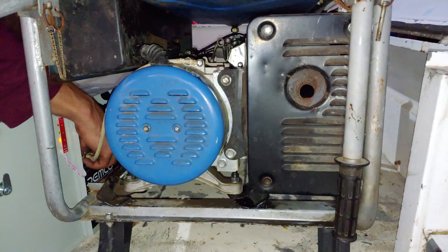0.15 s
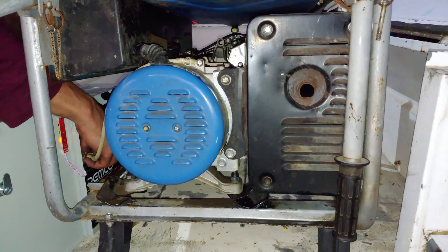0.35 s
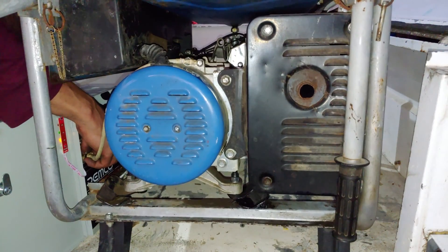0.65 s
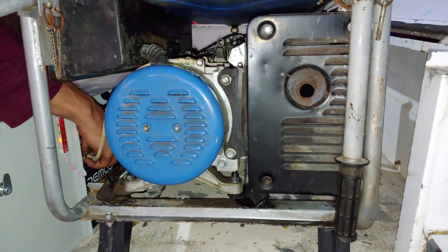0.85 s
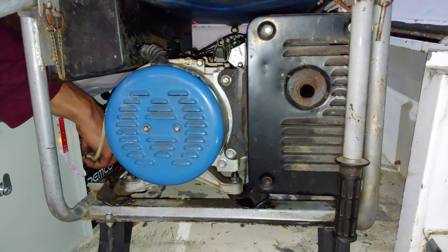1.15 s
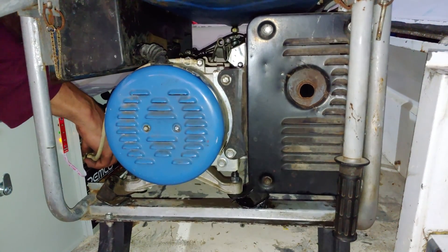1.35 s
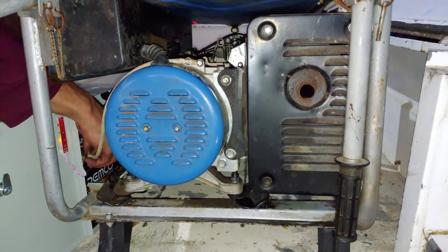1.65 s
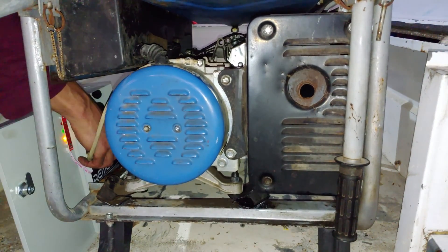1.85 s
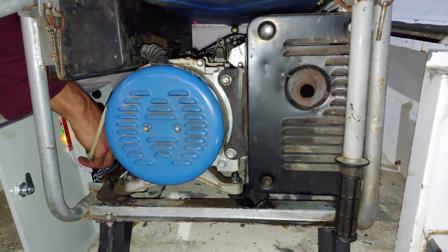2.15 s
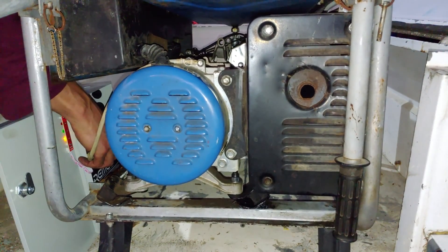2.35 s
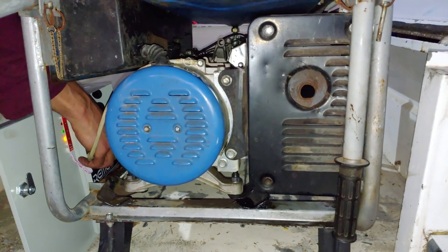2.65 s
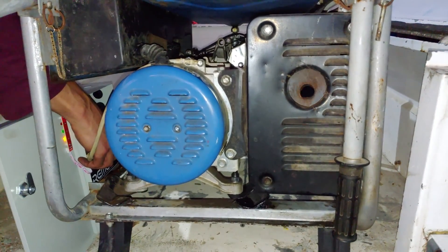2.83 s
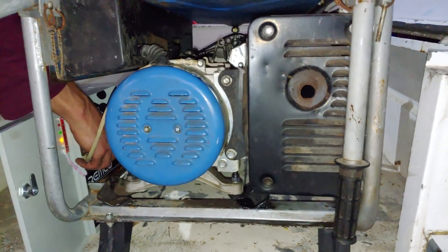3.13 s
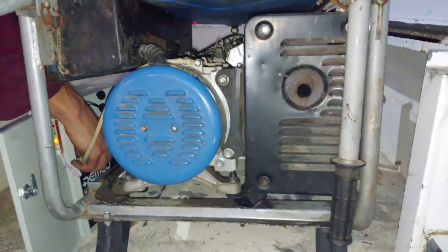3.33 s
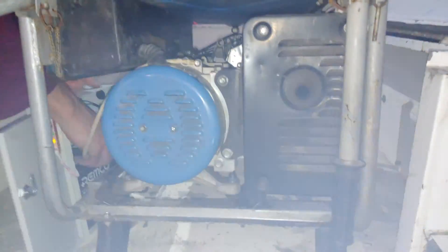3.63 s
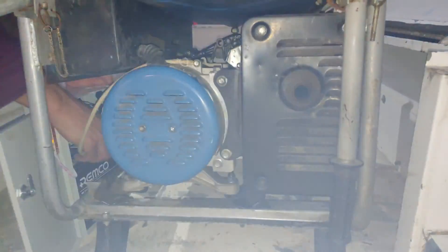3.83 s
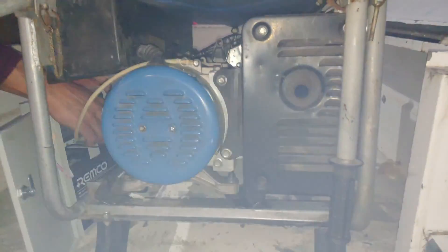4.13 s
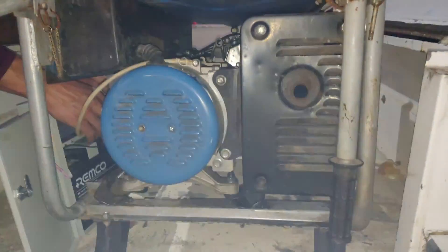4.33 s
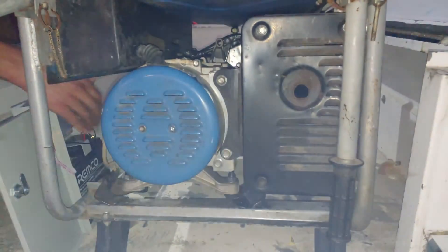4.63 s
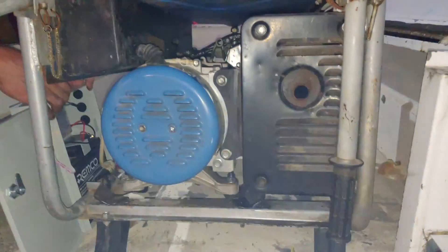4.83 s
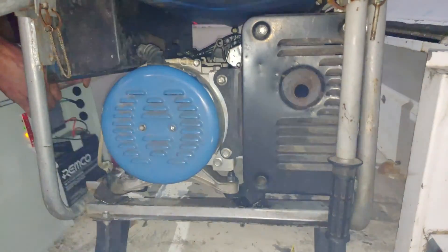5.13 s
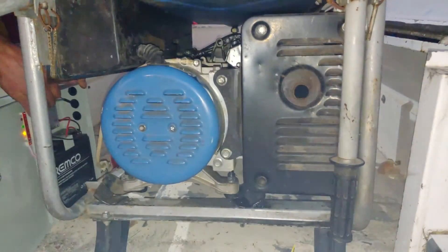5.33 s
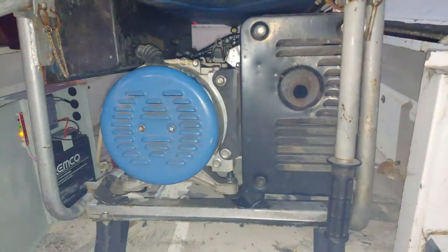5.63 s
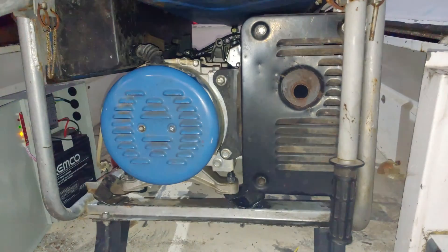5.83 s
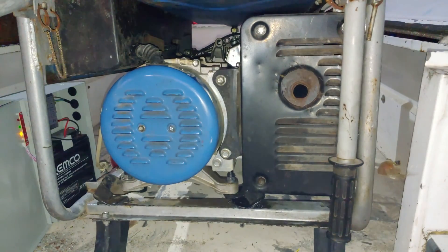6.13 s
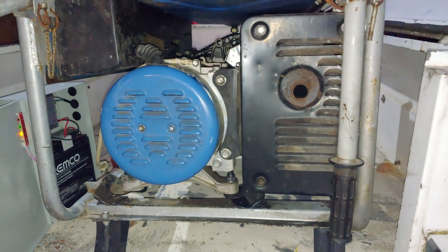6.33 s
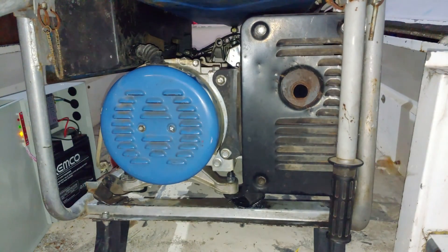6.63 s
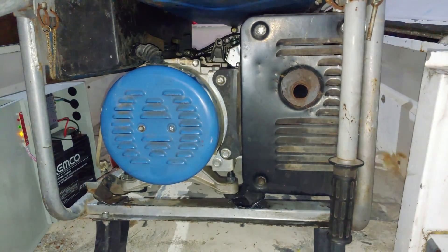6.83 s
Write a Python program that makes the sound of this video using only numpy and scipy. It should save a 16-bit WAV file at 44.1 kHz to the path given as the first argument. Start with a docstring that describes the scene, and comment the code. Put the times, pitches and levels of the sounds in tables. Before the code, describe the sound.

A whining, rattling starter tries twice before a small petrol engine fires with hissing exhaust puffs and settles into an even run.

```python
"""A small petrol generator starts up

The electric starter cranks in vain, rests, clunks in again and whines up. The one-cylinder engine
catches, fires every other cycle, then runs evenly. Its exhaust points at a stereo microphone: each
stroke hisses first, then its puff of gas arrives and buffets the two microphone ports."""
import sys
import numpy as np
from scipy import signal
from scipy.fft import rfft, irfft, next_fast_len
from scipy.io import wavfile
from scipy.ndimage import uniform_filter1d, map_coordinates

SR = 44100
rng = np.random.default_rng(int(sys.argv[2]) if len(sys.argv) > 2 else 0)


def file_out(sig):
    """Save sig as 16-bit WAV at sys.argv[1]."""
    # one column per channel
    cols = np.atleast_2d(sig).T
    # limit, then scale
    lim = np.clip(cols, -1, 1)
    pcm = np.round(lim * 32767).astype(np.int16)
    wavfile.write(sys.argv[1], SR, pcm)


N = 307818
TIME = np.arange(N) / SR
CAUGHT_S = 3.3  # the engine catches
SIDE = np.array([[1], [-1]])  # left, right; a pan is left minus right

# Uneven exhaust strokes. Each row: start in seconds, hiss level in dB.
UNEVEN_STROKES = [(3.308, -23), (3.3923, -24.5), (3.4636, -25.5), (3.5294, -26), (3.5906, -24.5),
                  (3.6506, -22.5), (3.708, -27), (3.7606, -26), (3.814, -25.5), (3.865, -40),
                  (3.9121, -22.5), (4.006, -22.5), (4.0955, -19), (4.185, -19.5), (4.2702, -21),
                  (4.354, -25.5), (4.437, -22), (4.5207, -25.5), (4.604, -24), (4.645, -25.5),
                  (4.6869, -27), (4.7676, -21.5), (4.8516, -23.5), (4.9344, -22.5), (5.0165, -22),
                  (5.097, -24), (5.179, -25), (5.259, -22), (5.342, -24.5), (5.421, -22.5), (5.5038, -27.5),
                  (5.585, -22), (5.6642, -22.5), (5.705, -24.5), (5.7465, -26.5), (5.786, -26),
                  (5.823, -26.5), (5.86, -24.5), (5.901, -34.5)]
# Even running. Each row: time in seconds, firings a second, thump level in dB.
EVEN_RUN = [(5.88, 26.5, -32), (6.1, 26.4, -26), (6.42, 26.0, -24), (6.98, 26.0, -23)]
# The engine's sound draws to the middle. Each row: time in seconds, left-right likeness (1 is the same).
LIKENESS = [(3.3, 0.37), (3.9, 0.27), (4.3, 0.59), (4.6, 0.79), (5.1, 0.99), (5.8, 0.96), (6.3, 0.94),
            (6.98, 0.9)]
# Escaping gas. Each row: frequency in Hz, level in dB.
HISS_COLOUR = [(530, -8), (900, 3.5), (1750, 3), (2980, -9), (3250, -6), (5360, -7.5), (5910, -11.5),
               (7590, -9), (9130, -22), (11500, -22), (12100, -23), (15700, -60), (22000, -120)]
# Takes the treble off thumps, rings and barks. Each row: frequency in Hz, gain in dB.
MUFFLING = [(1500, 0), (3000, -12), (6000, -40)]
# How the pipe and the silencer shell ring. Each row: pitch in Hz, width in Hz, level in dB.
PIPE_RINGS = [(175, 50, 0), (310, 60, -6), (470, 100, -10), (625, 40, -8), (885, 60, -10), (1042, 20, 0),
              (1130, 110, -7)]
SHELL_RINGS = [(1239, 30, 3), (2130, 92, -20)]
def exhaust(idle_gap_s=.075, idle_lead_s=.031):
    """Each stroke hisses and rings the silencer shell; even running also thumps the pipe in step."""
    rate, thump_db = curves(EVEN_RUN)
    hiss_db = curves(BLOCK_LEVELS)[0] - 6
    running = TIME > EVEN_RUN[0][0]
    turns = 2 * np.cumsum(rate * running) / SR + .9  # two shaft turns for each firing
    at = np.flatnonzero(np.diff(np.floor(turns)))
    firing = np.floor(turns[at + 1]) % 2 == 0
    scatter = rng.standard_normal((len(at), 2))
    pushes, gas = np.zeros((2, N))
    pushes[at] = np.where(firing, 1, .35) * amp(1.3 * scatter[:, 0])
    gas[at] = firing * amp(hiss_db[at] + 1.4 * scatter[:, 1])
    starts, db = np.transpose(UNEVEN_STROKES)
    chance = rng.standard_normal((len(starts), 3))
    fired = np.round(starts * SR).astype(int)
    # after a long gap, a faint idle stroke leads the next firing
    idle = np.round((starts - idle_lead_s) * SR).astype(int)[1:][np.diff(starts) > idle_gap_s]
    gas[fired] = amp(db)
    gas[idle] = amp(-34 + 2 * chance[:len(idle), 1])
    snaps = valve_snaps(fired, idle, chance)
    age = TIME[:SR // 8]
    hold = (1 - np.exp(-age / .0025)) * amp(-60 * age / .2) / (1 + (age / .028) ** 6)
    alike, = curves(LIKENESS)
    hiss = play_at(gas, hold) * amp(-1.5 + 2.1 * wobble(340)) * coloured(noise(alike), HISS_COLOUR)
    thump = coloured(ringing(pushes, PIPE_RINGS), MUFFLING) * np.sqrt(running.mean())
    shell = ringing(gas ** 2, SHELL_RINGS, spread_ms=.022)  # hard strokes ring it far more
    return snaps + hiss + amp(-41) * coloured(shell, MUFFLING) + amp(thump_db) * thump


# The valve's tick. Each row: frequency in Hz, level in dB.
TICK_COLOUR = [(500, -33.5), (1200, -12.5), (3000, -17), (4200, -12), (4600, 1), (5200, -13.5),
               (7800, -6.5), (9500, -14), (12000, -13), (16000, -4.5)]
# Its pings. Each row: pitch in Hz, level in dB, seconds to fade by 60 dB.
VALVE_PINGS = [(4260, -21, 0.025), (4850, -5, 0.018), (7070, -0.5, 0.028), (8100, -9.5, 0.034),
               (10300, -14, 0.017)]
def valve_snaps(fired, idle, chance, fade_db_per_s=5.5):
    """The valve snaps open with a tick and a ping, ever fainter as the engine settles."""
    starts, db = np.transpose(UNEVEN_STROKES)
    hurried = np.diff(starts, prepend=0) < .05  # close behind the last stroke, so softer
    snap_db = -30.5 - fade_db_per_s * (starts - CAUGHT_S) + .44 * (db - db.mean()) - 5 * hurried
    snaps = np.zeros(N)
    snaps[fired] = amp(snap_db + 1.6 * chance[:, 0])
    snaps[idle] = amp(-61.5 + 2.5 * chance[:len(idle), 2])
    age = TIME[:SR // 8]
    shape = (1 - np.exp(-(age / .0014) ** 2)) * amp(-60 * age / .044)
    alike, = curves(LIKENESS)
    tick = amp(17.5) * play_at(snaps, shape) * coloured(noise(alike - .25), TICK_COLOUR)
    pings = 0
    for hz, ping_db, fade_s in VALVE_PINGS:
        ping = amp(-60 * age / fade_s) * np.sin(2 * np.pi * hz * age)
        pings += play_at(snaps * amp(ping_db + 3.2 * wobble(38)), ping)
    return tick + amp(1 - 1.5 * SIDE) * pings


# Puffs reaching the microphone. Each row: start in seconds, level in dB.
GAS_PUFFS = [(0.081, -17.5), (0.21, -9), (0.331, -17), (0.45, -14.5), (0.583, -14), (0.699, -12),
             (0.827, -11), (0.947, -7), (1.09, -17), (1.197, -11), (1.335, -17), (1.475, -14), (1.583, -12),
             (1.699, -8), (1.824, -14), (2.731, -21), (2.851, -17.5), (2.931, -15), (3.145, -12),
             (3.226, -13), (3.256, -4.5), (3.33, -7), (3.418, -5.5), (3.485, -9), (3.554, -5.5),
             (3.613, -5), (3.671, -8.5), (3.726, -10), (3.787, -8), (3.831, -16.5), (3.931, -7.5),
             (4.037, -7), (4.123, -11.5), (4.207, -6), (4.295, -7), (4.334, -18.5), (4.373, -10),
             (4.459, -6), (4.548, -10.5), (4.634, -7.5), (4.668, -7.5), (4.716, -11), (4.795, -7),
             (4.877, -5), (4.959, -8), (5.038, -10), (5.125, -7), (5.209, -6.5), (5.294, -7),
             (5.368, -10.5), (5.452, 0), (5.532, -7.5), (5.609, -5), (5.699, -10.5), (5.746, -14.5),
             (5.794, -8.5), (5.84, -13.5), (6.045, -17), (6.309, -16.5), (6.405, -17), (6.455, -19),
             (6.549, -20.5), (6.631, -16), (6.757, -15), (6.857, -21.5), (6.937, -18)]
# Where the jet points. Each row: time in seconds, pan in dB.
JET_AIM = [(0, -17), (1.3, -1.5), (1.8, 2), (2.7, 10.5), (3.15, 12.5), (3.3, -4), (6.98, 2.5)]
# How differently the two ports feel an eddy. Each row: time in seconds, amount (0 is the same).
PORT_CONTRAST = [(3, 3), (3.4, 2.9), (4.3, 2.9), (4.6, 1), (5.8, 0.47), (6, 0.44)]
# How the ports colour an eddy. Each row: frequency in Hz, gain in dB.
PORT_COLOUR = [(15, -21.5), (40, 5.5), (100, 0.5), (200, -2), (350, -4.5), (700, 1), (1300, 0),
               (2200, -8.5), (5000, -35)]
def puffs(eddies=12, strays_per_s=7, stray_db=-23, lead_s=.03):
    """A puff is a cluster of eddies (swirls of gas), each one swing of pressure on the ports."""
    out = np.zeros((2, N + SR))
    t = np.arange(SR // 4) / SR - lead_s
    even_s, order = EVEN_RUN[0][0], np.arange(eddies)
    slots = np.arange(even_s, N / SR, 1 / strays_per_s)
    strays = [(s + rng.random() / strays_per_s, stray_db) for s in slots]
    for s, db in GAS_PUFFS + strays:
        length_s = .036 * amp(.402 * (-9 - 8 * (s > even_s) - db))  # weak puffs linger
        eddy_s = .001056 if s > CAUGHT_S else .00145  # smaller once the engine fires
        pan_db = np.interp(s, *np.transpose(JET_AIM)) + 2.5 * rng.standard_normal()
        jitter, size, sign, share, lag, odd = rng.random((eddies, 6)).T
        when = -length_s * .51 * np.log(1 - .97 * (order + jitter) / eddies) * (order > 0)
        width = eddy_s * amp(-1 + 9 * (size - .5) + 6.5 * (when / length_s - .4))  # later is larger
        swell = np.exp(-when / (.59 * length_s)) * (1.3 - np.exp(-when / .0042))
        strength = np.sign(sign - .5) * swell * amp(-5 * np.log(1 - .95 * odd))  # a few stand out
        strength[2] = .9 * np.sign(strength[2])  # a strong eddy comes early
        unlike = np.interp(s, *np.transpose(PORT_CONTRAST))
        puff = np.zeros((2, len(t)))
        for port, side in enumerate((1, -1)):
            passage = (t - when[:, None]) / width[:, None] - side * .39 * unlike * (lag[:, None] - .5)
            swings = passage * np.exp(-np.abs(passage) ** 1.354)
            puff[port] = (strength * (1 + side * unlike * (share - .5))) @ swings
        energy = amp(2 * db - 3.5) * length_s * SR
        puff *= np.sqrt(energy / np.sum(puff ** 2, axis=1, keepdims=True))
        start = round((s - lead_s) * SR)
        out[:, start:start + len(t)] += puff * amp(SIDE * pan_db / 2)
    return filtered(out[:, :N], lambda hz: amp(along(PORT_COLOUR, hz)))


# Sharp barks inside fired puffs. Each row: start in seconds, level in dB, pitch in Hz, pan in dB.
PUFF_BARKS = [(3.415, -8, 307, 2), (3.484, -12, 420, -12), (3.555, -7, 564, -7), (3.564, -8, 322, 0.0),
              (3.616, -7, 301, -6), (3.626, -6, 530, 3), (3.672, -3.5, 543, 2), (3.684, -6.5, 420, 1),
              (3.703, -11.5, 305, 4.0), (3.727, -8, 298, -6), (3.787, -12, 390, 11),
              (3.835, -11.5, 433, 14), (3.914, -13, 310, -4), (3.942, -21, 310, 2.0),
              (4.038, -11, 413, -13), (4.119, -7, 301, -15), (4.209, -2, 407, 0), (4.297, -4, 416, -4),
              (4.341, -9.5, 361, 6), (4.387, -8, 300, -10), (4.463, -25, 298, 0), (4.545, -15, 363, 13),
              (4.639, -10, 425, -3), (4.666, -19, 304, 7), (4.715, -11, 386, -4.0), (4.794, -10.5, 369, -1),
              (4.876, -14, 420, 4), (4.885, -8, 332, -2), (4.96, -12, 390, -4.0), (5.039, -7.5, 356, -2.0),
              (5.128, -16, 390, -4), (5.207, -10.5, 322, -1), (5.294, -4.5, 314, 2), (5.372, -6.5, 473, -2),
              (5.456, -10, 450, 0), (5.535, -11, 484, -3), (5.61, -14, 330, -3), (5.697, -13, 510, -5),
              (5.79, -16, 360, 0)]
def barks(fade_cycles=2.25, pitch_sag=.44, spit_db=-8.5):
    """A few fast swings of pressure start hard and fall in pitch, with a spit of rough noise."""
    out, t = np.zeros((2, N)), TIME[:SR // 25]
    rise = 1 - np.exp(-(t / .00084) ** 2)
    for (s, db, hz, pan_db), (turn, apart) in zip(PUFF_BARKS, rng.random((len(PUFF_BARKS), 2)) - .5):
        unlike = 1 - np.interp(s, *np.transpose(LIKENESS))
        fade = np.exp(-t * hz / fade_cycles)
        cycles = np.cumsum(hz * (1 + pitch_sag * (1.51 * fade - .8))) / SR
        phase = 2 * np.pi * (cycles + .5 + .28 * turn + 1.13 * unlike * apart * SIDE)
        swing = np.sin(phase) + .63 * fade * (np.sin(2 * phase) + .17 * np.sin(3 * phase))
        shared, own = uniform_filter1d(rng.standard_normal((2, len(t))), size=26, axis=1)
        spit = unit(shared + np.sqrt(unlike) * own * SIDE)
        bark = rise * (fade * swing + amp(spit_db) * fade ** 1.3 * spit)
        start = round(s * SR)
        out[:, start:start + len(t)] += amp(db + 3.5 + SIDE * pan_db / 2) * bark
    return filtered(out, lambda hz: amp(along(MUFFLING, hz)))


# Which port each part of the starter faces. Each row: frequency in Hz, pan in dB.
STARTER_PAN = [(400, -2), (1200, -3.5), (1550, 2), (1900, -1.5), (2380, 8.5), (2900, -8), (3150, -3),
               (3500, 0.5), (3880, -1), (4300, -1), (5700, 2.5), (6500, 6), (7100, 2), (8000, -7.5),
               (9000, 5)]
def starter():
    """An electric motor turns the engine through gears that groan, rattle, knock and whine."""
    gears = gear_groan() + gear_rattle() + gear_knocks() + gear_whine()
    return filtered(gears, lambda hz: amp(SIDE * along(STARTER_PAN, hz) / 2))


# Surges of load. Each row: time in seconds, level in dB.
LOAD_SURGES = [(2.785, -19), (2.83, -32), (2.9, -23.5), (2.97, -17.5), (3.01, -21), (3.115, -14.5),
               (3.17, -27), (3.235, -20.5), (3.27, -27), (3.316, -15)]
# How loaded gears ring. Each row: pitch in Hz, width in Hz, level in dB.
GROAN_RINGS = [(910, 81, 3.5), (1048, 45, 9.5), (1250, 110, 7), (1660, 140, -19)]
def gear_groan():
    """The gears groan as they push against the gas squeezed in the cylinder."""
    times, db = np.transpose(LOAD_SURGES)
    return amp(db) @ bumps(times, .017) * ringing(noise(.54), GROAN_RINGS)


# The rattle. Each row: time in seconds, then ringing, grinding and treble levels in dB.
RATTLE_LEVELS = [(0, -14.5, -23, -16), (1.8, -16, -22, -18), (1.87, -26, -33.5, -29.5),
                 (1.9, -36.5, -41, -38), (1.915, -72, -88, -97), (2.27, -91, -79, -89),
                 (2.3, -20, -10.5, -48), (2.34, -36, -25.5, -50), (2.43, -31.5, -23, -35),
                 (2.5, -23, -26.5, -26.5), (2.71, -19.5, -24, -20), (2.74, -22.5, -23, -28),
                 (2.82, -24.5, -22.5, -28), (2.93, -32, -23.5, -28.5), (3.15, -25, -20, -25),
                 (3.32, -24.5, -21, -30.5), (3.36, -51, -49, -53), (3.4, -86, -95, -90)]
# When the piston squeezes the gas during the first try, in seconds.
SQUEEZES = [-.04, .2, .45, .69, .935, 1.2, 1.425, 1.685]
# The starter's housing (low) and casing (high). Each row: pitch in Hz, width in Hz, level in dB.
HOUSING_RINGS = [(408, 23, -11), (770, 48, -6), (842, 21.3, -5), (908, 33, -8), (1042, 14, -7.5),
                 (1261, 19, -4), (1561, 10.5, -6), (1608, 19, -6), (1731, 17, 2), (1833, 22, -4),
                 (2090, 44, -18.5), (2364, 28, -11), (1700, 64, -6)]
CASING_RINGS = [(3140, 35, 0), (3218, 30, 0), (3430, 45, -2), (3780, 60, -3), (3885, 80, -1),
                (4250, 140, -6), (4700, 70, -3), (5100, 130, -6), (5565, 70, -2), (5666, 40, -5),
                (6250, 200, -10), (6540, 160, -4), (6950, 300, -10), (7900, 500, -17), (10000, 2500, -22)]
# Grinding teeth. Each row: frequency in Hz, level in dB.
GRIND_COLOUR = [(300, -11), (600, 0), (900, 7), (1300, 1), (2000, -5), (2800, -21.5), (4200, -14),
                (6600, -19), (9000, -35.5), (12000, -51), (13000, -72.5)]
def gear_rattle(waver_ms=.079, loaded_s=2.72):
    """Teeth strike unevenly and shake the housing; the ringing sags after each squeeze."""
    ring_db, grind_db, treble_db = curves(RATTLE_LEVELS)
    sag_db = -2.5 * bumps(np.add(SQUEEZES, .11), .013).sum(0)
    strikes = amp(1.57 * wobble(300) + 1.06 * wobble(40.38))
    housing = ringing(strikes * noise(.54), HOUSING_RINGS, spread_ms=.083)
    ring = amp(ring_db + sag_db) * wavering(housing, waver_ms, rate=27)
    grind = amp(grind_db + 2.4 * wobble(90)) * coloured(noise(.82), GRIND_COLOUR)
    casing = ringing(strikes * noise(.33), CASING_RINGS, spread_ms=.055)
    casing = coloured(casing, [(9000, -3.5), (11300, -9.5), (12200, -40)])
    casing = wavering(casing, np.where(TIME < loaded_s, waver_ms / 2, .4), rate=25)  # blurs under load
    return ring + grind + amp(treble_db + 1.3 * sag_db + .7 * wobble(6.4)) * casing


# The key, the gears meeting, then later knocks. Each row: start in seconds, level in dB.
KNOCK_HITS = [(2.162, -45), (2.218, -35.5), (2.274, -14), (2.279, -14), (2.284, -11), (2.288, -11),
              (2.294, 3), (2.3055, -3), (2.313, -1), (2.3175, -5), (2.33, -9), (2.752, -4), (2.778, -1.5),
              (2.964, -11.5), (3.109, -12), (3.308, -4.5)]
# How the starter's small gear rings. Each row: pitch in Hz, width in Hz, level in dB.
SMALL_GEAR_RINGS = [(400, 81, -4), (830, 60, -1), (896, 55, -3), (1260, 90, -11), (1780, 85, -6),
                    (2570, 110, -21)]
def gear_knocks(fade_s=.031):
    """Each knock makes a short clunk and rings the small gear."""
    blows, taps = np.zeros((2, N))
    for s, db in KNOCK_HITS:
        blows += amp(db - 60 * np.abs(TIME - s) / fade_s) * (TIME > s)
        taps[round(s * SR)] = amp(db)
    colour = [(150, -33.5), (400, -15.5), (900, -.5), (1400, -22), (5000, -17.5), (12000, -38.5),
              (13000, -59)]
    clunk = np.sqrt(np.mean(blows ** 2)) * coloured(blows * noise(.38), colour)
    return amp(-9.5) * clunk + amp(-39.5) * ringing(taps, SMALL_GEAR_RINGS, spread_ms=.0295)


# The whine stops, then climbs. Each row: time in seconds, pitch in Hz, level in dB, overtones in dB.
WHINE_PATH = [(1.854, 774, -31.5, -16), (1.901, 754.4, -78, -16), (2.33, 219.6, -80, -1),
              (2.358, 233.4, -41, 8), (2.42, 301.3, -32.5, 3), (2.46, 410.6, -29.5, -4.5),
              (2.495, 470, -31, 2), (2.53, 536.3, -30, -2), (2.565, 583, -28.5, -3), (2.61, 636, -21, -6),
              (2.64, 677.5, -26.5, -0.5), (2.66, 688, -23.5, -3), (2.71, 681, -19.5, -10),
              (2.749, 697, -66, -4)]
# Its overtones. Each row: multiple of the pitch, level in dB.
WHINE_OVERTONES = [(2, 3), (3, -5), (4, -13), (5, -8), (6, -8), (7, -10.5), (8, -8)]
def gear_whine(teeth=9, brake_s=.01664, recover_s=.13):
    """Teeth meet fast enough to sing a note; each squeeze brakes the starter and lowers it."""
    free, braked = (771.6, -26.5, -11.5), (724.3, -29, -11.5)  # pitch, level, overtones
    cranking = []
    for s in SQUEEZES:
        cranking += [(s - brake_s / 2, *free), (s + brake_s / 2, *braked), (s + recover_s, *free)]
    hz, level_db, overtone_db = curves(cranking + WHINE_PATH)
    rough = amp(overtone_db)  # greatest while it gathers speed
    hz = hz * (1 + (.0045 + .012 * rough) * wobble(150) + .013 * wobble(28))
    phase = 2 * np.pi * np.cumsum(hz) / SR + .16 * rough * wobble(250)
    tone = np.sin(phase) + amp(-8.5) * np.sin(phase * (teeth + 1) / teeth)  # a worn tooth adds a note
    for multiple, db in WHINE_OVERTONES:
        gain = amp(overtone_db + db + 1.4 * wobble(150) + 3.3 * wobble(30))
        tone += gain * np.sin(multiple * (phase + .069 * wobble(200)))
    tone = tone * amp(level_db + 3.5 * wobble(110) + 2.3 * wobble(34.95) - 1.1 * wobble(21.94) * SIDE)
    # louder wherever it passes a pitch at which the housing rings
    return filtered(tone, lambda f: 1 + amp(3) * sum(
        1 / (1 + ((f - pitch) / (1.22 * width)) ** 2) for pitch, width, _ in HOUSING_RINGS))


# The engine block's rattle. Each row: time in seconds, level in dB.
BLOCK_LEVELS = [(2.9, -35), (3.21, -23.5), (3.32, -53), (3.4, -35), (3.71, -35.5), (4.19, -31.5),
                (4.6, -33.5), (5.0, -29.5), (5.59, -30.5), (6.06, -23.5), (6.5, -21), (6.98, -18.5)]
# How the block rings. Each row: pitch in Hz, width in Hz, level in dB.
BLOCK_RINGS = [(183, 21, 14), (340, 35, 0), (727, 58, 10), (860, 200, 13.5), (1054, 25, 19),
               (1090, 160, -0.5), (1140, 28, 14.5), (1150, 57, -4), (1590, 400, -27)]
# Cooling air. Each row: frequency in Hz, level in dB.
FAN_COLOUR = [(900, -22), (1500, 3.5), (3000, -10), (4000, -9), (6000, -19.5), (7800, -21.5), (8600, -35),
              (12000, -38), (13000, -55), (20000, -120)]
def block_and_fan(fan_db=-7):
    """The block rattles and cooling air rushes, dipping slightly after each uneven stroke."""
    block_db, = curves([(BLOCK_LEVELS[0][0] - .2, -90)] + BLOCK_LEVELS)
    alike, = curves(LIKENESS)
    lull_db = -bumps(np.transpose(UNEVEN_STROKES)[0] + .044, .01).sum(0)
    shaking = amp(1.1 * wobble(120)) * noise(alike + .05)
    ring = coloured(ringing(shaking, BLOCK_RINGS), MUFFLING)
    rattle = coloured(noise(alike + .06), [(200, -31), (500, -5.5), (1500, -19.5), (3000, -31),
                                           (6000, -50)])
    fan = amp(fan_db + lull_db + .99 * wobble(30)) * coloured(noise(alike - .04), FAN_COLOUR)
    return amp(block_db) * (ring + .5 * rattle + fan)


# Gas flowing over the ports. Each row: time in seconds, rumble level in dB, flutter level in dB.
DRAUGHT_LEVELS = [(0, -28, -36.5), (.7, -28.5, -45), (1.75, -30.5, -36.5), (1.85, -38, -60),
                  (1.96, -76, -58.5), (2.21, -60, -54.5), (2.35, -62, -39), (2.55, -49, -46),
                  (2.7, -37, -34), (2.76, -33, -42), (3.07, -25.5, -24), (3.96, -23.5, -18),
                  (4.5, -29.5, -22.5), (5.21, -39, -21.5), (5.99, -36.5, -25), (6.67, -28, -24),
                  (6.98, -29.5, -24.5)]
# The rumble, then the flutter. Each row: frequency in Hz, level in dB.
RUMBLE_COLOUR = [(12, -25.5), (25, -11.5), (50, 3), (90, -0.5), (200, -6.5), (600, -48)]
FLUTTER_COLOUR = [(40, -29), (110, -0.5), (300, -6), (700, -15.5), (1500, -29), (3000, -67)]
def draught():
    """Flowing gas rumbles and flutters on the ports; the flutter calms while a puff is on its way."""
    rumble_db, flutter_db = curves(DRAUGHT_LEVELS)
    calm_db = -4.5 * bumps(np.transpose(UNEVEN_STROKES)[0], .0082).sum(0)
    alike, = curves(LIKENESS)
    lumps = amp(3.7 * wobble(40) + 1.5 * np.array([wobble(40), wobble(40)]))
    rumble = coloured(noise(alike - .2), RUMBLE_COLOUR)
    flutter = coloured(lumps * noise(alike + .46), FLUTTER_COLOUR)
    return amp(rumble_db + 4.5) * rumble + amp(flutter_db + calm_db + 1.5) * flutter


# The background. Each row: time in seconds, level in dB.
AIR_LEVELS = [(1.85, -48), (2.0, -55), (2.14, -58), (2.17, -39.5), (2.27, -42), (2.3, -48)]
# Its tone. Each row: frequency in Hz, level in dB.
AIR_COLOUR = [(18, -35), (30, -12), (65, 9), (148, -6), (223, -14), (319, -7.5), (621, -23.5),
              (6600, -46.5), (9000, -85), (11700, -110), (19800, -120)]
def distant_air():
    """A low, distant hum of air lies under everything."""
    return amp(curves(AIR_LEVELS)[0]) * coloured(noise(.72), AIR_COLOUR)


def amp(db):
    """Turn dB into a gain."""
    return 10 ** (np.asarray(db) / 20)


def unit(x):
    """Scale to an average power of 1."""
    return x / np.sqrt(np.mean(x ** 2) + 1e-20)


def along(points, hz):
    """Read between (Hz, value) points, spaced by octaves."""
    f, v = np.transpose(points)
    return np.interp(np.log(hz + 1), np.log(f + 1), v)


def curves(rows):
    """One value per sample for each column after the time."""
    times, *columns = np.transpose(rows)
    return [np.interp(TIME, times, column) for column in columns]


def wobble(rate):
    """A smooth curve through `rate` random points a second."""
    return map_coordinates(rng.standard_normal(int(N * rate / SR) + 4), [np.arange(N) * rate / SR])


def bumps(times, wide_s):
    """One smooth hump of height 1 per time."""
    return np.exp(-((TIME - np.reshape(times, (-1, 1))) / wide_s) ** 2)


def noise(alike):
    """Stereo white noise with a given left-right likeness."""
    a, b = rng.standard_normal((2, N))
    turn = np.arccos(np.clip(alike, -1, 1)) / 2
    return np.cos(turn) * a + np.sin(turn) * b * SIDE


def play_at(hits, shape):
    """Start a copy of the shape at every hit."""
    return signal.fftconvolve(hits, shape)[:N]


def filtered(x, response):
    """Give each frequency its own gain."""
    size = next_fast_len(x.shape[-1] + 8192)
    return irfft(rfft(x, size) * response(np.fft.rfftfreq(size, 1 / SR)), size)[..., :x.shape[-1]]


def coloured(x, colour):
    """Shape the tone by (Hz, dB) points, at power 1."""
    return unit(filtered(x, lambda hz: amp(along(colour, hz))))


def ringing(x, rings, spread_ms=0):
    """Ring at the given pitches, at power 1; with a spread, they reach left or right first in turn."""
    leads = spread_ms / 1000 * (-1.) ** np.arange(len(rings))[:, None, None] * SIDE
    return unit(filtered(x, lambda f: sum(
        amp(db) * np.exp(1j * np.pi * hz * lead) * 1j * f * width / (hz * hz - f * f + 1j * f * width)
        for (hz, width, db), lead in zip(rings, leads))))


def wavering(x, depth_ms, rate):
    """Read the sound slightly early or late, so its pitch wavers."""
    at = np.arange(N) + depth_ms / 1000 * SR * wobble(rate)
    return np.array([map_coordinates(port, [at], order=3, mode="nearest") for port in x])


def scene():
    """The generator and the air around it."""
    return starter() + exhaust() + block_and_fan() + puffs() + draught() + barks() + distant_air()


def record(dry, top_hz=16300):
    """Strong puffs flatten at the top; the treble is dulled above about 12 kHz."""
    soft = dry / (1 + np.abs(dry / 1.05) ** 4) ** (1 / 4)
    roll_off = [(11800, -3), (12400, -24), (16000, -23.5)]
    return filtered(soft, lambda hz: amp(along(roll_off, hz)) * (hz < top_hz))


dry = scene()
out = record(dry)
file_out(out)
```